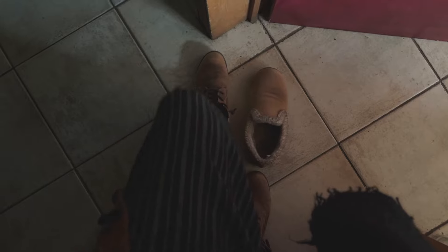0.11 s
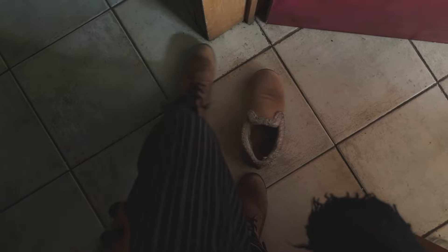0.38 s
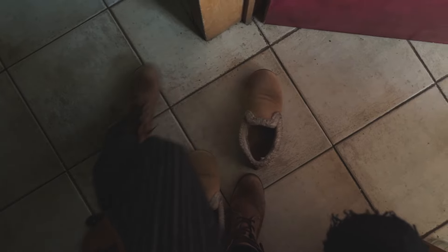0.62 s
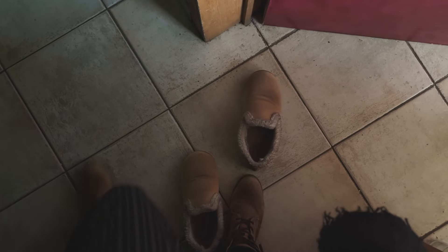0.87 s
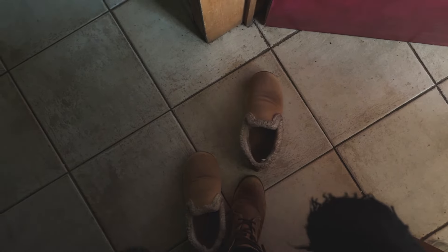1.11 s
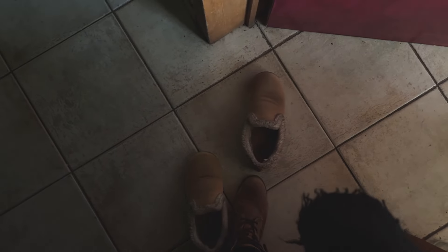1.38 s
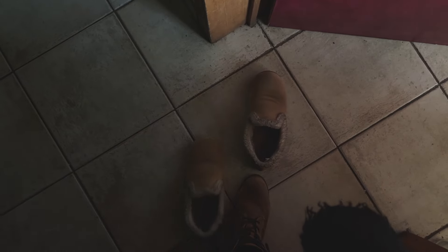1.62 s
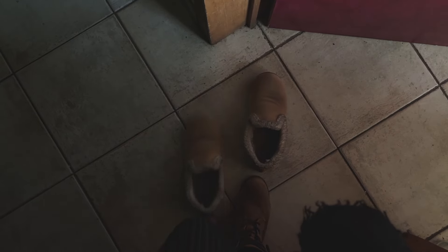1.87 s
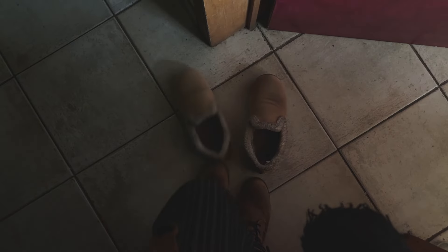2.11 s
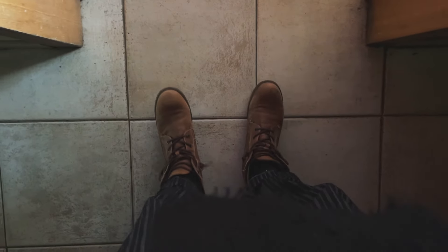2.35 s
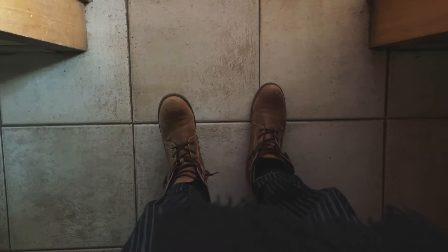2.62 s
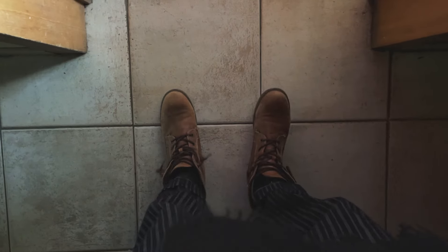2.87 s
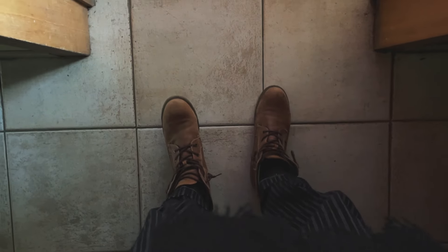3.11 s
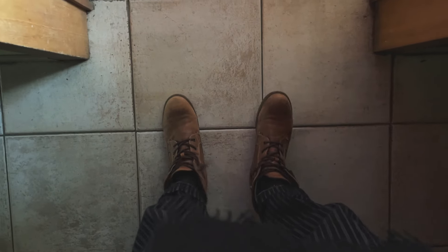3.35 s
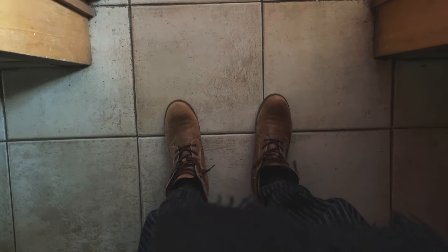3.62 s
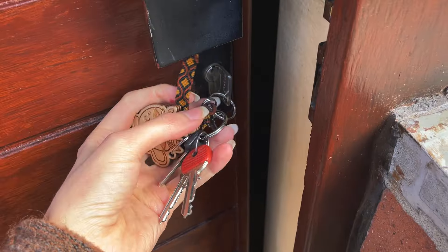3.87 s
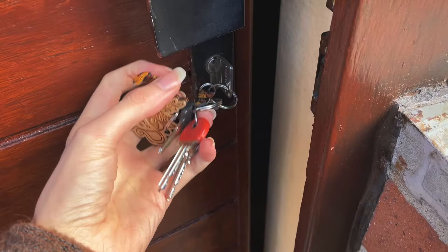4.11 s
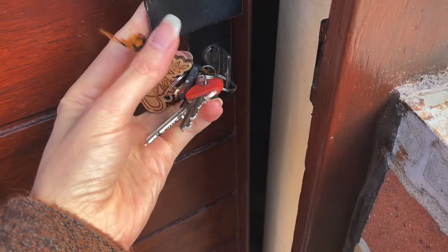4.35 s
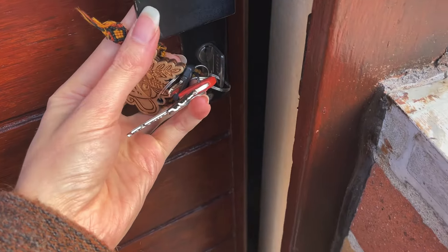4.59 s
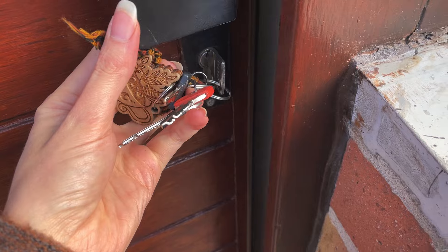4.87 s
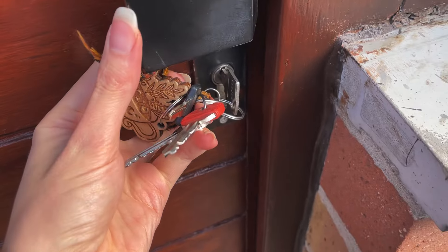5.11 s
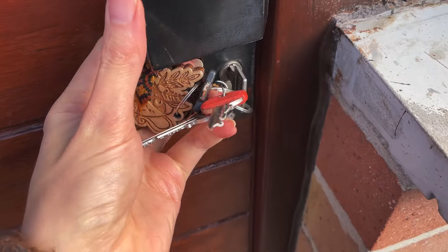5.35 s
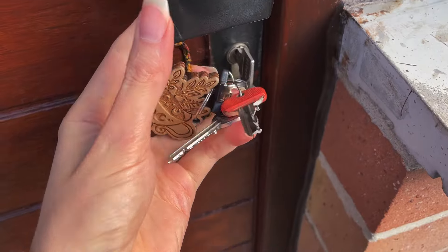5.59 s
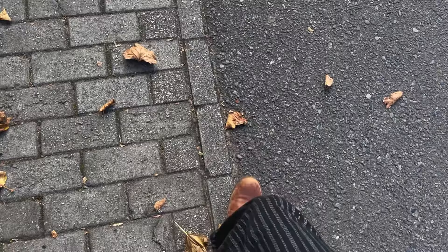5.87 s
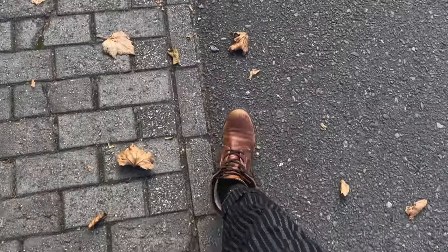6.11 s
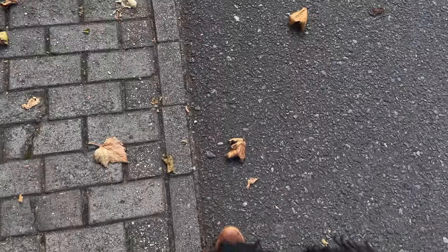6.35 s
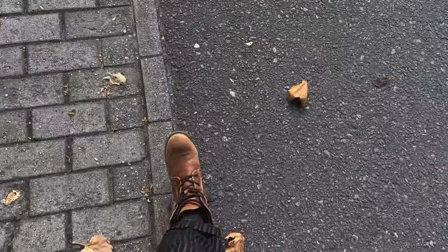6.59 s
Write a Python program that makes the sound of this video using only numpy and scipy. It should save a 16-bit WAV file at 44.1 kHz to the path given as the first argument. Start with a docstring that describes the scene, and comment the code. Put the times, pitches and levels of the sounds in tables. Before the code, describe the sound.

Close-up leaving home: fabric swish, boot knocks on tile, small key clinks, rising hinge squeak, booming door slam with rattle, few footsteps outside.

```python
"""A front door booms shut: cracks, panel and lock case are filtered noise, the whole leaf is ringing modes.
Before the slam its hinge creaks up into a squeak by stick-slip, and keys tick as noise bursts and modes.
Earlier, in a tiled hall, cloth rustles as grainy noise and boots stamp; a few steps and scuffs on the
pavement follow. Clicks, thuds and floor knocks make the steps. Hall, doorstep and street each have a low
murmur of coloured noise. All is heard close, at the two ports of a phone."""
import sys
import numpy as np
from scipy import signal
from scipy.fft import rfft, irfft
from scipy.io import wavfile
from scipy.ndimage import uniform_filter1d

SR = 44100
rng = np.random.default_rng(int(sys.argv[2]) if len(sys.argv) > 2 else 0)


def store_pcm(level_fs):
    """Save levels as 16-bit WAV."""
    pcm = np.round(np.clip(level_fs, -1, 1) * 32767).astype(np.int16)
    wavfile.write(sys.argv[1], SR, np.atleast_2d(pcm).T)


def elevation(decibels):
    """Turn decibel levels (scalar or array-like) into linear amplitude ratios."""
    levels = np.asarray(decibels, float)
    return 10 ** (levels / 20)


N = 296219
T = np.arange(N) / SR

# Levels in the tables are relative; the functions trim and vary them.
# latch touch and strike, rebounds, slam, rattle: t/s, crack level/dB, panel level/dB, boom level/dB,
# lock case level/dB
DOOR_HITS = [(5.167, -35, -62, -59, -56), (5.1829, 3.5, -10.5, -31, -34.5), (5.196, -14, -26, -36, -34),
             (5.215, -18, -40, -33.5, -34), (5.2636, -4.5, -24, -4.5, -26), (5.2726, -2, -21.5, -27, -14.5),
             (5.289, -14, -28.5, -35.5, -30), (5.3, -16.5, -33, -23.5, -43.5),
             (5.3634, -18, -29, -35.5, -36), (5.64, -42, -38.5, -34, -56)]
# colour of the metal crack: f/Hz, level/dB
CRACK_COLOUR = [(410, -26.5), (700, -4.5), (1610, -2), (2900, -3), (3970, -8.5), (4700, -2.5),
                (6680, -14.5), (11100, -17), (15800, -43)]
# colour of the panel thud: f/Hz, level/dB
PANEL_COLOUR = [(47, -30.5), (80, 2), (156, -6), (290, -10), (363, -16.5), (421, -10), (548, -17),
                (827, -15), (1000, -36), (1300, -64.5)]
# resonances of the lock case: f/Hz, level/dB, t60/s
LOCK_MODES = [(570, -6, 0.063), (1170, 3.5, 0.034), (1430, 8, 0.021), (2020, -8, 0.076)]
# resonances of the whole leaf: f/Hz, level/dB, t60/s
LEAF_MODES = [(48.36, -7, 0.77), (62, 7.5, 0.31), (80, -10, 0.2)]
# hinge stick-slip before the pin pulls on it: t/s, slip rate/(1/s), grip level/dB
HINGE_SLIPS = [(4.433, 64, -44.5), (4.459, 92, -38.5), (4.483, 146, -40), (4.529, 270, -37),
               (4.597, 446, -40), (4.621, 527, -40), (4.659, 644, -39.5), (4.699, 829, -39),
               (4.77, 1010, -41), (4.806, 1105, -43), (4.851, 1205, -48), (4.923, 1306, -49),
               (4.98, 1260, -56.5), (5.12, 1120, -76.5)]
# resonances of pin and leaf: f/Hz, width/Hz, level/dB
HINGE_MODES = [(859, 70, -16), (1160, 61, -7.5), (1335, 78, -7.5), (1450, 140, -3.5), (2170, 290, -11),
               (2694, 140, -7), (2838, 110, -7), (2970, 130, -0.5), (3700, 130, -10), (4740, 350, -21),
               (5710, 210, -20)]
# keys touching: t/s, level/dB, brightness/dB, jangle t60/s, clink f/Hz
KEY_TOUCHES = [(3.915, -27.5, -8.5, 0.011, 5560), (3.9243, -27.5, -53, 0.0088, 5900),
               (4.189, -40, -17, 0.032, 3660), (4.2155, -46, 14, 0.017, 1840),
               (4.416, -52.5, 6.5, 0.11, 2880), (5.459, -33.5, -23, 0.077, 1980),
               (5.563, -34, -19.5, 0.041, 1875), (5.639, -53, 12.5, 0.093, 5300),
               (5.66, -47, 9, 0.19, 5040), (5.7537, -35.5, -6.5, 0.049, 4500),
               (5.8441, -42, -22.5, 0.018, 2300)]
# nominal ring of the bunch: f/Hz, level/dB, t60/s
BUNCH_MODES = [(8070, -8, 0.02), (10440, -12, 0.05)]
# dry ticks of settling keys or grit: t/s, level/dB
DRY_TICKS = [(4.003, -63), (5.523, -49.5), (5.769, -47.5), (5.967, -56.5), (6.136, -46)]
# thin high tone among the keys: t/s, level/dB
THIN_TONE = [(4.14, -74), (4.38, -84), (4.85, -95), (5.08, -93), (5.168, -67)]
# boots on tile: t/s, click level/dB, thud level/dB
HALL_STEPS = [(0.484, -70, -48), (0.8874, -41.5, -42.5), (.975, -54, -47.5), (1.02, -52, -54),
              (1.4464, -45, -43), (1.472, -58, -62), (2.4815, -31, -33.5), (2.7871, -38.5, -37),
              (3.0658, -21.5, -34), (3.241, -44, -85), (3.344, -27, -35.5), (3.6036, -24.5, -29.5),
              (3.784, -45, -77)]
# boots on paving: t/s, click level/dB, thud level/dB
STREET_STEPS = [(6.0873, -47, -41), (6.135, -30.5, -56), (6.2022, -37, -44.5), (6.233, -47, -55),
                (6.3929, -36, -44.5), (6.5853, -51, -44.5), (6.7114, -54, -38.5)]
# colour of the heel click: f/Hz, level/dB
HEEL_COLOUR = [(350, -18.5), (600, -3.5), (880, -2.5), (1500, -10), (3460, -18), (9430, -40),
               (14000, -58.5)]
# colour of the sole's thud, also of the dragged shoe: f/Hz, level/dB
SOLE_COLOUR = [(35, -21), (60, -0.5), (241, 0), (403, -4.5), (709, -11), (900, -17), (1200, -46),
               (1560, -67)]
# tiled floor under the sole: f/Hz, level/dB, t60/s
TILE_MODES = [(141.3, -3, 0.14), (234, 2.5, 0.15), (282, 6, 0.065), (340, -8.5, 0.041), (528, -16, 0.15)]
# paving under the sole: f/Hz, level/dB, t60/s
PAVING_MODES = [(425, 13.5, 0.017)]
# a shoe dragged over the tile: t/s, level/dB
SHOE_DRAG = [(0.399, -59.5), (.75, -58), (0.929, -51.5), (1.301, -66), (1.6, -63)]
# trousers and slippers rubbing: t/s, level/dB, swish f/Hz, swish level/dB
CLOTH_RUBS = [(0, -73.5, 2480, -8), (0.121, -70, 2490, -6), (.19, -57, 2800, -32), (.26, -66, 2500, -13),
              (0.349, -58, 2700, -5.5), (.56, -60.5, 2490, -29.5), (.66, -55.5, 3000, -27.5),
              (.81, -52, 1274, -5), (.88, -57, 1590, -21.5), (1.04, -58, 2580, -10),
              (1.48, -67.5, 1600, -16), (1.53, -56.5, 2200, 2), (1.622, -54, 1917, -4),
              (1.72, -60.5, 2005, -7), (1.77, -58, 2197, 4.5), (1.9, -56.5, 2130, -4),
              (2.079, -55, 2417, 3.5), (2.17, -55.5, 2184, -10.5), (2.201, -100, 2017, -16)]
# soles scraping the paving: t/s, length/s, level/dB, swish f/Hz, swish level/dB
SOLE_SCRAPES = [(6.109, 0.035, -65, 2202, 6), (6.174, 0.067, -70, 2588, 5),
                (6.266, 0.09, -44.5, 2997, -15.5), (6.367, 0.03, -53.5, 2580, -37),
                (6.579, 0.0036, -61, 2640, 12), (6.632, 0.008, -54, 2550, 4)]
# body colour of rubbing: f/Hz, level/dB
RUB_COLOUR = [(150, -20), (291, -7.5), (614, -21.5), (715, -13), (2380, -14), (5920, -14), (6800, -13),
              (8840, -73)]
# treble sheen of rubbing: f/Hz, level/dB
SHEEN_COLOUR = [(4120, -31), (7000, -9), (10100, -12), (13200, -25), (14400, -30.5), (15800, -12)]
# phase by which the left port leads the right, for hall and street: f/Hz, lead/rad
HALL_LEAD = [(300, 0.5), (1000, 1.02), (4500, 1.19), (5600, 0.6), (6600, -3.5), (15700, -8)]
# the same for door and keys: f/Hz, lead/rad
DOOR_LEAD = [(300, 1), (1300, 1.3), (5500, 1.5), (6500, -1.5), (15700, -13)]
# the same for the hinge, off to the left: f/Hz, lead/rad
HINGE_LEAD = [(300, 0.5), (5200, 12.06), (15700, 1)]
# left port over right, before panning: f/Hz, level/dB
PORT_TILT = [(60, -2), (200, -5), (500, 2.5), (1000, 3.5), (4000, 5), (8000, 1)]
# moments at which hall gives way to doorstep, and doorstep to street: t/s
PLACE_STARTS = [3.905, 5.79]
# murmur in hall, doorstep, street: level/dB
PLACE_LEVELS = [-55.5, -50, -50.5]
# murmur colour, one list each for hall, doorstep, street: f/Hz, level/dB
PLACE_COLOURS = [
    [(18, -51), (30, -26.5), (139, -4.5), (176, -21.5), (1030, -39), (1690, -43), (3500, -50), (15000, -69)],
    [(18, -50), (30, -9.5), (139, -10.5), (281, -15), (511, -28), (3980, -57.5), (11000, -66),
     (15000, -61.5)],
    [(18, -35), (30, -19), (59, 1), (119, -6.5), (374, -13), (662, -32), (1170, -25.5), (2370, -40),
     (15000, -66)],
]
# air resonances, one list each for hall, doorstep, street: f/Hz, level/dB, t60/s
PLACE_DRONES = [
    [(100.6, -22, 0.2), (124, -44, 0.52)],
    [(103, -18.5, .4), (144.1, -10, 0.34)],
    [(303, -15.5, 0.12)],
]


def unit(x):
    """Scales to rms 1."""
    return x / np.sqrt(np.mean(x ** 2))


def colour(x, points, size=4096):
    """Causal minimum-phase filter shaped by (f/Hz, level/dB) points; white noise keeps its rms."""
    hz, db = np.transpose(points)
    grid_hz = np.arange(size // 2 + 1) * SR / size
    log_gain = np.interp(np.log(grid_hz + 1), np.log(hz + 1), db) * np.log(10) / 20
    cepstrum = irfft(log_gain)
    cepstrum[1:size // 2] *= 2
    cepstrum[size // 2 + 1:] = 0
    impulse = unit(irfft(np.exp(rfft(cepstrum)))) / np.sqrt(size)
    return signal.fftconvolve(x, impulse)[:len(x)]


def ring(x, modes):
    """Sums decaying resonances; a unit tap starts each at its listed gain."""
    out = 0
    for hz, db, t60 in modes:
        pole = np.exp(2j * np.pi * hz / SR - np.log(1000) / (t60 * SR))
        out = out + elevation(db) * signal.lfilter([1], [1, -pole], x).imag
    return out


def bursts(times, db, t60, rise_s=0.00099):
    """Noise that rises quickly and dies by 60 dB in t60."""
    envelope = np.zeros(N + SR)
    t = T[:SR // 2]
    for s, level, fall in np.broadcast(times, db, t60):
        start = int(s * SR)
        envelope[start:start + SR // 2] += elevation(level - 60 * t / fall) * (1 - np.exp(-t / rise_s))
    return envelope[:N] * rng.standard_normal(N)


def pushes(times, db, push_s):
    """Soft contacts: half-sine forces of unit area, scaled by level."""
    taps = np.zeros(N)
    taps[(np.asarray(times) * SR).astype(int)] = elevation(np.asarray(db))
    force = np.sin(np.linspace(0, np.pi, int(push_s * SR) + 3))
    return np.convolve(taps, force / force.sum())[:N]


def walk(rate):
    """Slow random wander of rms 1, with a new target rate times a second."""
    k = int(SR / rate)
    targets = np.repeat(rng.standard_normal(N // k + 1), k)
    return unit(uniform_filter1d(targets, k)[:N])


def contour(s, db):
    """Level curve in dB through the points, silent outside them."""
    return np.interp(T, s, db, -150, -150)


def door():
    """Metal cracks and the panel thuds; the lock case clacks and the whole leaf booms against the frame."""
    s, crack_db, panel_db, boom_db, lock_db = np.transpose(DOOR_HITS)
    crack = colour(bursts(s, crack_db - 5.5, 0.029, 0.0024), CRACK_COLOUR)
    panel = colour(bursts(s, panel_db + 1, 0.11, 0.0032), PANEL_COLOUR)
    lock = ring(bursts(s, lock_db - 13, 0.05, 0.002), LOCK_MODES)
    boom = ring(pushes(s, boom_db, 0.014), LEAF_MODES)
    boom = signal.sosfilt(signal.butter(2, 42, "high", fs=SR, output="sos"), boom)
    # the second part stays out of the echo
    return crack + panel + 0.24 * lock, 0.47 * lock + boom


def hinge(jitter=0.002, scatter_db=0.8, throb_db=1.5, grit_db=-15):
    """Stick-slip: single slips speed up into a squeak and ring pin and leaf."""
    pin_hz, pin_pull, jump_db = 2900, 0.4, -18
    catch_s, catch_gap_s, catch_db = 4.926, 0.054, 6
    s, rate, db = np.transpose(HINGE_SLIPS)
    speed = np.interp(T, s, rate, 0, 0)

    # the ringing pin pulls the slip rate towards a whole fraction of its pitch
    ratio = pin_hz / (speed + 1)
    nearest = pin_hz / np.maximum(np.round(ratio), 1)
    # the grip falters where the rate jumps from one fraction to the next
    strain = (2 * (ratio - pin_hz / nearest)) ** 8 * (speed < pin_hz / 3) * (speed > pin_hz / 7)
    speed = speed + pin_pull * (nearest - speed) * (speed > 0) * (speed < pin_hz / 3)
    phase = np.cumsum(speed * (1 + jitter * walk(200))) / SR + 0.97

    # each slip is a short smooth click at its exact moment
    at = np.interp(np.arange(1, int(phase[-1])), phase, np.arange(N))
    size = elevation(scatter_db * rng.standard_normal(len(at)))
    index = at.astype(int)[:, None] + np.arange(-6, 7)
    clicks = size[:, None] * np.sinc(0.7 * (index - at[:, None])) * np.hanning(13)
    slips = np.zeros(N)
    np.add.at(slips, index, clicks)

    # quicker slips are smaller; rust grinds between them, less so at speed
    pace = speed / rate.max()
    grit = elevation(grit_db - 10 * pace) * rng.standard_normal(N) * np.exp(-(phase % 1) / 0.5)
    slips = slips * np.sqrt(SR / (speed + 1)) + grit
    # quick slips throb; near full speed the hinge catches and lets go
    throb = throb_db * pace * walk(35)
    catch = catch_db * pace ** 8 * np.cos(2 * np.pi * (T - catch_s) / catch_gap_s)
    slips = slips * elevation(contour(s, db) + jump_db * strain + throb + catch)

    modes = [(hz, level + 20 * np.log10(width / SR) + 26, np.log(1000) / np.pi / width)
             for hz, width, level in HINGE_MODES]
    # the heavy leaf joins in with pace, the pin rings at once, the top dulls at full speed
    leaf = ring(slips * pace ** 0.44, modes[:5])
    pin = ring(slips, modes[5:8])
    top = ring(slips * (1 - 0.8 * pace ** 20), modes[8:])
    body = signal.lfilter(*signal.butter(2, [800, 5500], "band", fs=SR), leaf + pin + top)
    bare_clicks = elevation(-35) * (1 - pace) ** 2 * np.diff(slips, prepend=0)
    return body + bare_clicks


def keys():
    """Each touch jangles for a moment and rings the bunch a little differently; a thin tone wavers on."""
    out = np.zeros(N)
    half = SR // 2
    chance = rng.standard_normal((len(KEY_TOUCHES), 2 * len(BUNCH_MODES)))
    for (s, db, bright_db, t60, clink_hz), c in zip(KEY_TOUCHES, chance):
        tick = bursts(0, db, 0.0088, 0.0017)[:half]
        jangle = bursts(0, db, t60, 0.0014)[:half]
        modes = [(hz * (1 + 0.018 * a), level + 3 * b + bright_db, fall)
                 for (hz, level, fall), a, b in zip(BUNCH_MODES, c[::2], c[1::2])]
        clink = ring(jangle, modes + [(clink_hz, 3, 0.006), (5300, -3, 0.012)])
        tick = colour(tick, [(500, 7), (5500, -13), (7000, bright_db), (14000, bright_db)])
        start = int(s * SR)
        out[start:start + half] += elevation(2) * tick + elevation(-28.5) * clink
    s, db = np.transpose(DRY_TICKS)
    dry_ticks = bursts(s, db, 0.011, 0.000147)
    out += colour(dry_ticks, [(1500, 11), (4000, 5.5), (7000, 6), (14000, -2.5), (17000, -18)])
    tone_level = elevation(contour(*np.transpose(THIN_TONE)) + 9 * walk(6.6))
    return out + tone_level * np.sin(2 * np.pi * 10330 * T + 0.58 * walk(150))


def steps(table, click_t60, thud_t60, thud_db, knock_db, knock_delay_s, modes):
    """Heel click and sole thud land together; the floor knocks a moment after."""
    brush_s, brush_db = 0.012, -22
    s, click_db, low_db = np.transpose(table)
    click = bursts(s, click_db - 0.5, click_t60, 0.00048)
    # the sole starts to skim the ground just before it lands
    brush = bursts(s - brush_s, click_db + brush_db, 10 * brush_s, brush_s)
    thud = bursts(s, low_db + thud_db, thud_t60, 0.00072)
    knock = ring(pushes(s + knock_delay_s, low_db + knock_db, 0.0016), modes)
    return colour(click + brush, HEEL_COLOUR) + colour(thud, SOLE_COLOUR) + knock


def drag():
    """Low bumpy scuffing as a foot works into its shoe: sole-coloured noise of wandering level."""
    level = contour(*np.transpose(SHOE_DRAG)) + 2.7 * walk(36)
    return colour(rng.standard_normal(N) * elevation(level), SOLE_COLOUR)


def rub(db, swish_hz, swish_db, grain_db, surge_db, swish_width_hz):
    """Fibres catching: dense uneven grains with a surging swish and a bright sheen."""
    unevenness = grain_db * walk(400) + 1.9 * np.array([walk(40) for _ in range(3)])
    grains = rng.standard_normal((3, N)) * elevation(unevenness)
    # a narrow noise band carried up to the moving swish pitch, and again higher up
    band = uniform_filter1d(grains[2], int(SR / swish_width_hz))
    turn = 2 * np.pi * np.cumsum(swish_hz * (1 + 0.06 * walk(11))) / SR
    swish = band * (np.cos(turn) + elevation(-6.5 + 3.2 * walk(8)) * np.cos(1.65 * turn))
    body = unit(colour(grains[0], RUB_COLOUR)) + elevation(swish_db + surge_db * walk(16)) * unit(swish)
    # the sheen gives way as the swish grows
    sheen = elevation(-6 - 0.23 * swish_db) * unit(colour(grains[1], SHEEN_COLOUR))
    return elevation(db) * (body + sheen)


def cloth():
    """One long rustle while the shoes are changed: rubbing whose level and swish move smoothly."""
    s, db, swish_hz, swish_db = np.transpose(CLOTH_RUBS)
    return rub(contour(s, db), np.interp(T, s, swish_hz), np.interp(T, s, swish_db), 0.87, 1.3, 750)


def scuffs():
    """Each scrape rises fast, holds and trails off; the loudest one sets the colour."""
    rise_s, fall_db_per_s = 0.012, 482
    s, length, db, swish_hz, swish_db = np.transpose(SOLE_SCRAPES)[:, :, None]
    rise = 20 * np.log10(np.clip((T - s) / rise_s, 1e-6, 1))
    fall = fall_db_per_s * np.clip(T - s - length, 0, None)
    shape = db + rise - fall
    now = shape.argmax(axis=0)
    return rub(shape.max(axis=0), swish_hz[now, 0], swish_db[now, 0], 3.1, 0.99, 1200)


def ports(x, lead, pan_db):
    """One source reaches two nearby ports with a phase lead and a level difference that vary with pitch."""
    size = N + 101  # padded for the transform
    hz = np.fft.rfftfreq(size, 1 / SR)
    bass_alike = np.clip(hz / 400, 0, 1)  # the phase lead shrinks in the bass
    phase = bass_alike * np.interp(hz, *np.transpose(lead))
    tilt_db = pan_db + np.interp(hz, *np.transpose(PORT_TILT))
    turn = np.exp(0.5j * phase) * elevation(tilt_db / 2)
    wave = rfft(x, size)
    return np.array([irfft(wave * turn, size)[:N], irfft(wave / turn, size)[:N]])


def room(x, low_t60, high_t60, db, split_hz=1500):
    """Diffuse noise tail, partly different at each port; the treble dies sooner."""
    noise = rng.standard_normal((3, SR))
    noise = noise[0] + 1.46 * noise[1:]
    low = signal.lfilter(*signal.butter(1, split_hz, fs=SR), noise)
    t = T[:SR]
    tail = low * elevation(-60 * t / low_t60) + (noise - low) * elevation(-60 * t / high_t60)
    tail *= np.clip(t / 0.0011, 0, 1) * elevation(db)
    return signal.fftconvolve(x[None], tail, axes=1)[:, :N]


def murmur():
    """Each place hums with its own coloured noise and air resonances; bass alike at both ports."""
    place = np.searchsorted(PLACE_STARTS, T)
    mid, side = 0, 0
    for k, (db, points, drones) in enumerate(zip(PLACE_LEVELS, PLACE_COLOURS, PLACE_DRONES)):
        share = uniform_filter1d(elevation(db) * (place == k), size=200)
        hum = colour(rng.standard_normal(N), points)
        drone = elevation(-15.5) * ring(rng.standard_normal(N), drones)
        mid = mid + share * (hum + drone)
        side = side + share * colour(rng.standard_normal(N), points)
    side = signal.lfilter(*signal.butter(1, 500, "high", fs=SR), side)
    both = (mid + side * np.array([[1], [-1]])) * elevation(np.array([[-0.7], [0.7]]))
    return both * elevation(1.8 * walk(11))


def scene():
    """Hall, doorstep and street in turn, each source with its own echo."""
    leaf, boom = door()
    creak = hinge()
    porch = leaf + keys()
    hall = steps(HALL_STEPS, 0.025, 0.094, 0, -3.1, 0.00458, TILE_MODES) + drag()
    rustle = cloth()
    street = steps(STREET_STEPS, 0.0093, 0.057, 9.5, 0, 0.0011, PAVING_MODES) + scuffs()
    mix = ports(porch + boom, DOOR_LEAD, -0.4) + room(porch, 0.53, 0.13, -42, split_hz=1000)
    mix += ports(creak, HINGE_LEAD, -1) + room(creak, 0.28, 0.086, -33)
    mix += ports(hall + rustle, HALL_LEAD, -0.83)
    mix += room(hall, 0.34, 0.29, -37.5) + room(rustle, 0.37, 0.018, -33.5)
    mix += ports(street, HALL_LEAD, -0.5) + room(street, 0.53, 0.069, -41)
    return mix + murmur()


def roll_off(x):
    """The treble ends steeply here."""
    return signal.sosfilt(signal.butter(12, 16090, fs=SR, output="sos"), x)


def record(dry):
    """The phone cuts the deepest bass and rounds the loudest peaks."""
    cut = signal.lfilter(*signal.butter(2, 34, "high", fs=SR), dry)
    rounded = np.tanh(0.59 * cut) / 0.61
    return roll_off(rounded)


dry = scene()
out = record(dry)
store_pcm(out)
```